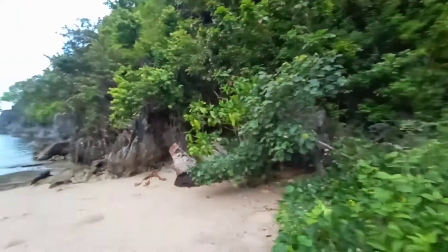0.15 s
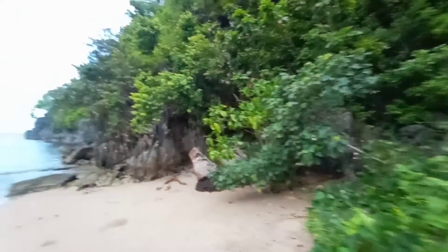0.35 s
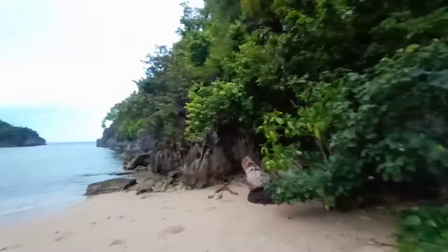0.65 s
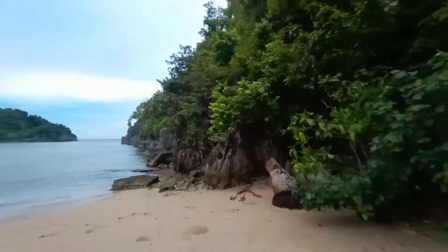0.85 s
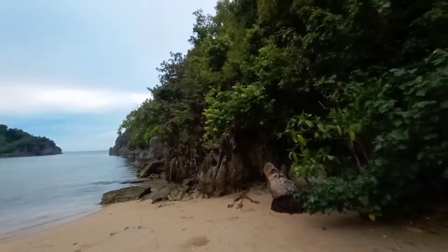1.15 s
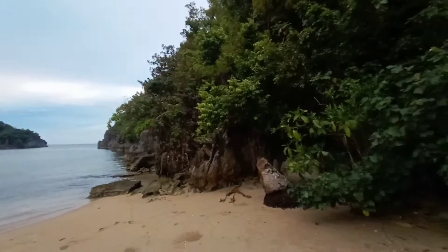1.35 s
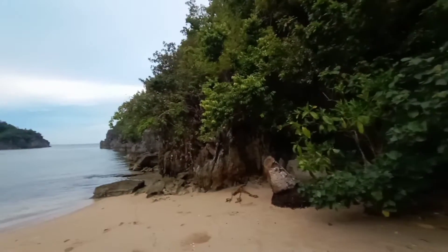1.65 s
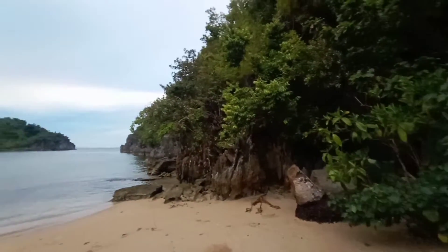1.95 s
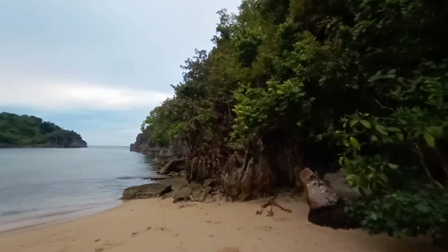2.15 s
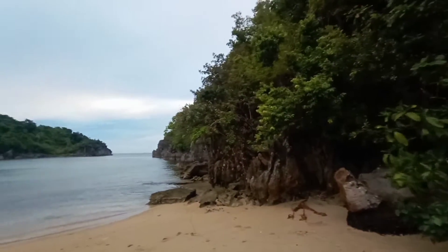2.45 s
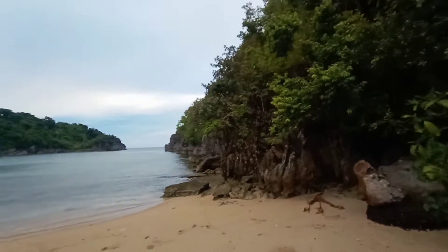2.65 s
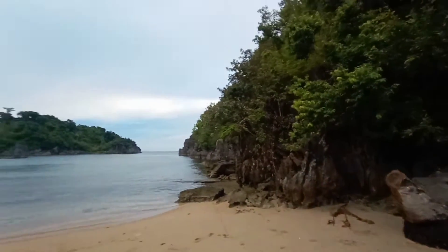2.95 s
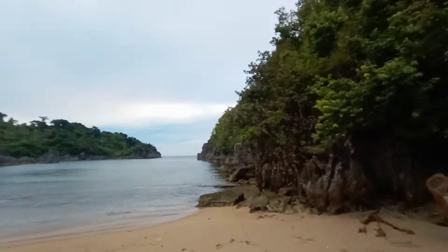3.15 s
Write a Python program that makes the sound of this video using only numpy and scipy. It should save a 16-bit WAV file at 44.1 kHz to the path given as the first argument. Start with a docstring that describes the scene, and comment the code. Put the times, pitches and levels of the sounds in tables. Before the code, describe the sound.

Small waves wash onto sand: foam rushes over a low slosh with popping bubbles, swells again with sharp splashes, then drains quietly. Close, nearly mono, hollow sound from a microphone inside a housing, outdoors on a beach.

```python
"""Small waves wash up a sandy beach and drain back, heard by a microphone that sits in a housing.
At first foam rushes over a low slosh amid many bubble pops; near 1.3 s the rush swells again with sharp splashes.
From about 2 s the water drains and fades, with a few splashes and longer watery blips towards the end at 3.3 s.
Noise and swarms of short sines form the water; the housing's resonances colour most of it and sing near 1250 Hz.
The two channels are almost alike: a common middle, a faint noise in opposite phase, and hiss."""
import sys
import numpy as np
from scipy import signal
from scipy.fft import rfft, irfft, next_fast_len
from scipy.io import wavfile
from scipy.ndimage import uniform_filter1d, map_coordinates

SR = 44100
rng = np.random.default_rng(int(sys.argv[2]) if len(sys.argv) > 2 else 0)


def waveform_to_disk(signal):
    """Save audio, clipped to [-1, 1], as 16-bit WAV at the path in sys.argv[1]."""
    frames = np.transpose(np.atleast_2d(signal))
    scaled = np.clip(frames, -1, 1) * 32767
    samples = np.round(scaled).astype(np.int16)
    wavfile.write(sys.argv[1], SR, samples)


N = 145530  # samples, 3.3 s


def amp(db):
    """Logarithmic level: 20 dB is a factor of ten in amplitude."""
    return 10 ** (np.asarray(db) / 20)


def unit(x):
    """Normalisation: the signal is scaled to rms 1."""
    return x / np.sqrt(np.mean(x ** 2) + 1e-20)


def along(points, hz):
    """Logarithmic frequency scale: (Hz, value) points are joined by lines over log frequency."""
    point_hz, value = np.transpose(points)
    return np.interp(np.log(hz + 1), np.log(point_hz + 1), value)


def curves(rows):
    """Linear interpolation in time: one value per sample for each column after the time."""
    s, *columns = np.transpose(rows)
    t = np.arange(N) / SR
    return [np.interp(t, s, column) for column in columns]


def wobble(rate):
    """Slow random modulation: a smooth curve through random knots, rate knots a second."""
    knots = rng.standard_normal(int(N * rate / SR) + 4)
    return map_coordinates(knots, [np.arange(N) * rate / SR])


def filtered(x, response):
    """Linear filtering: the spectrum of x is multiplied by a response of frequency."""
    size = next_fast_len(N + 8192)
    hz = np.fft.rfftfreq(size, 1 / SR)
    return irfft(rfft(x, size) * response(hz), size)[..., :N]


def housed(x, lo_hz, hi_hz):
    """Cavity resonance: one band of x takes on the colour of the housing, at rms 1."""
    # Response of the housing. Each row: frequency in Hz, relative level in dB.
    housing = [(24, -67), (40, -41), (111, -15.5), (192, -11.5), (260, -12), (387, -10.5), (496, -8),
               (606, -5), (859, -7.5), (998, -7.5), (1130, -6), (1250, 6.5), (1380, -3), (2010, -8),
               (2570, -3), (3470, -4), (3930, -9.5), (4460, -25.5), (5300, -22), (6160, -22.5),
               (7160, -21.5), (8110, -28), (9180, -25.5), (12700, -52), (15500, -43)]

    def response(hz):
        low_edge = 1 + (lo_hz / (hz + 1)) ** 16
        high_edge = 1 + (hz / hi_hz) ** 16
        return amp(along(housing, hz)) / np.sqrt(low_edge * high_edge)

    return unit(filtered(x, response))


def patchy(depth_db):
    """Modulated noise: white noise whose gain varies in random patches of time and frequency."""
    z = signal.stft(rng.standard_normal(N), nperseg=1024, noverlap=768)[2]
    field = uniform_filter1d(rng.standard_normal(z.shape), size=4, axis=0)  # over frequency
    field = uniform_filter1d(field, size=18, axis=1)  # over time
    noise = signal.istft(z * amp(depth_db * unit(field)), nperseg=1024, noverlap=768)[1]
    return unit(noise[:N])


def bubbles(s, gain, hz, cycles, rise, size=500):
    """Bubble resonance: short sines swell and fade; a positive rise lifts their pitch on the way."""
    u = np.arange(size) / SR * (hz / cycles)[:, None]  # time in units of the length
    swell = (np.e * 2 * u * np.exp(-2 * u)) ** 2  # peaks at 1 when u = 0.5
    wave = gain[:, None] * swell * np.sin(2 * np.pi * cycles * u * (1 + rise * u))
    at = (s * SR).astype(int)[:, None] + np.arange(size)
    return np.bincount(at.ravel(), wave.ravel(), N + size)[:N]


def foam(lo_hz, hi_hz, cycles, spread_db, share, depth_db, count, size=500):
    """Incoherent summation: bubbles of chance pitch and gain add in power to a patchy rush."""
    place = rng.random((count, 2))
    chance = np.clip(rng.standard_normal(count), -2.5, 2.5)
    s = place[:, 0] * N / SR
    pitch_hz = lo_hz * (hi_hz / lo_hz) ** place[:, 1]
    grains = bubbles(s, amp(spread_db * chance), pitch_hz, cycles, 0.029, size=size)
    # share is the bubbles' part of the power
    mix = np.sqrt(share) * unit(grains) + np.sqrt(1 - share) * patchy(depth_db)
    return housed(mix, lo_hz, hi_hz)


def focused(x, centre_hz, lift_db, width, size):
    """Moving resonance: a lifted band follows a centre while the power of each frame is kept."""
    overlap = size - size // 8
    hz, t, z = signal.stft(x, SR, nperseg=size, noverlap=overlap)
    centre = np.interp(t * SR, np.arange(N), centre_hz)
    distance = np.log((hz[:, None] + 1) / centre) / width
    lift = amp(lift_db * np.exp(-distance ** 2))
    power_ratio = np.sum(np.abs(z * lift) ** 2, 0) / np.sum(np.abs(z) ** 2 + 1e-20, 0)
    lift /= np.sqrt(power_ratio + 1e-9)
    return unit(signal.istft(z * lift, SR, nperseg=size, noverlap=overlap)[1][:N])


def drone():
    """Low-pass noise: a steady faint background falls away above 60 Hz."""
    noise = rng.standard_normal(N)
    return amp(-95) * unit(filtered(noise, lambda hz: 1 / (1 + (hz / 60) ** 4)))


def microphone_hiss():
    """Self-noise: treble hiss above 11 kHz, mostly common to both channels, with a weaker opposed part."""
    # Spectrum of the self-noise. Each row: frequency in Hz, relative level in dB.
    hiss_spectrum = [(5590, -32), (9500, 0), (11400, 6.5), (12600, 4), (14900, 4), (15500, 12.5)]
    noise = rng.standard_normal((2, N))
    hiss = filtered(noise, lambda hz: amp(along(hiss_spectrum, hz)) * (hz > 11000))
    centre, spread = unit(hiss[0]), amp(-12) * unit(hiss[1])
    return amp(-75) * np.array([centre + spread, centre - spread])


def sides():
    """Phase opposition: faint patchy noise, independent of the middle, to be added left and subtracted right."""
    # Spectrum of the noise that differs. Each row: frequency in Hz, relative level in dB.
    apart_spectrum = [(15, -50), (25, -11), (160, 6), (759, -1), (1260, -10), (3500, -23), (3870, 12.5),
                      (6610, -64), (8750, -25), (11000, -47), (14300, -61), (22000, -120)]
    return amp(-79.5) * unit(filtered(patchy(2.6), lambda hz: amp(along(apart_spectrum, hz))))


def slosh():
    """Low-frequency resonance: water gurgles around a moving centre, over lapping and rumble."""
    # Gurgling. Each row: time in seconds, level in dB before the wobble, centre in Hz.
    gurgle_rows = [(0.0, -60.5, 239), (0.07, -49, 230), (0.13, -47.5, 486), (0.27, -47.5, 336),
                   (0.31, -61, 454), (0.5, -55.5, 172), (0.61, -43, 211), (0.67, -46, 267),
                   (0.9, -57.5, 247), (1.01, -52, 313), (1.17, -49, 246), (1.53, -51.5, 372),
                   (1.59, -45.5, 267), (1.77, -58, 396), (1.89, -53.5, 278), (1.96, -61.5, 412),
                   (2.13, -62.5, 373), (2.43, -69.5, 260), (2.46, -71.5, 490), (2.59, -67, 260),
                   (2.65, -62.5, 424), (3.11, -69.5, 192), (3.14, -65, 313), (3.3, -64.5, 292)]
    # Low bed. Each row: time in seconds, level of the lapping in dB, rumble in dB before its wobble.
    bed_rows = [(0.0, -67, -86), (0.07, -57, -63), (0.15, -51, -93), (0.27, -64, -64), (0.31, -57.5, -77),
                (0.42, -69, -59.5), (0.6, -52, -61), (0.65, -61, -83), (0.71, -55, -55.5), (0.81, -62, -77),
                (0.86, -62, -65), (0.95, -62, -77), (1.07, -61.5, -59.5), (1.29, -55, -62.5),
                (1.42, -59, -58), (1.49, -51.5, -74), (1.68, -55, -58), (1.71, -53.5, -67.5),
                (2.36, -74.5, -77.5), (3.3, -70.5, -71.5)]
    level_db, centre_hz = curves(gurgle_rows)
    lap_db, rumble_db = curves(bed_rows)
    gurgle = foam(125, 620, cycles=6, spread_db=3, share=.08, depth_db=2.5, count=900, size=4000)
    gurgle = focused(gurgle, centre_hz, 13, 0.78, size=2048)
    gurgle = amp(level_db + 1.9 * wobble(10.96)) * gurgle
    lap = foam(600, 1030, cycles=8, spread_db=3.8, share=.12, depth_db=4, count=700, size=1500)
    rumble = amp(rumble_db + 1.05 * wobble(5.67)) * housed(rng.standard_normal(N), 30, 138)
    return gurgle + amp(lap_db) * lap + rumble


def pops():
    """Bubble resonance: single bubbles ring at a steady pitch, short pops and longer blips of water."""
    # Bursting bubbles. Each row: time of the peak in seconds, peak in dB, pitch in Hz.
    pop_rows = [(0.007, -36, 7000), (0.021, -38, 9200), (0.039, -35, 4900), (0.051, -28, 5140),
                (0.081, -30, 6400), (0.141, -35, 6240), (0.153, -35, 4600), (0.167, -28.5, 6940),
                (0.230, -49, 9600), (0.257, -42, 8900), (0.266, -34, 9200), (0.316, -39, 9600),
                (0.688, -42, 6950), (0.689, -42.5, 10700), (0.838, -48, 9000), (0.938, -47, 9200),
                (1.038, -38.5, 6760), (1.055, -45, 7200), (1.174, -45, 9300), (1.241, -40, 8900),
                (1.271, -41, 9500), (1.272, -36, 5000), (1.418, -42, 8460), (1.686, -45, 9100),
                (1.890, -48, 9700), (3.105, -45, 9300)]
    # Blips of water. Each row: time of the peak in seconds, peak in dB, pitch in Hz, length in cycles.
    blip_rows = [(2.655, -55.5, 440, 11), (3.08, -60.5, 108, 7), (3.143, -48, 1120, 7),
                 (3.157, -51, 973, 16), (3.172, -56, 5050, 45), (3.245, -50, 5980, 38),
                 (3.25, -61, 5000, 60), (3.275, -56, 4970, 50), (3.285, -51.5, 287, 9)]
    rows = [(*row, 7.5) for row in pop_rows] + list(blip_rows)  # every pop is 7.5 cycles long
    total = np.zeros(N)
    for s, db, hz, cycles in rows:
        start = np.array([s - cycles / hz / 2])
        total += bubbles(start, amp([db]), np.array([hz]), cycles, 0, size=8000)
    return total


def splashes():
    """Impulsive noise: brief broad bursts start suddenly and decay exponentially."""
    # Splashes. Each row: start in seconds, level in dB before the decay, decay time in seconds.
    splash_rows = [(0.015, -35, 0.0035), (0.034, -46, 0.0054), (0.162, -44, 0.014), (0.23, -44, 0.0066),
                   (0.31, -40, .01), (0.568, -38, 0.011), (1.242, -28, 0.0069), (1.244, -32, 0.0027),
                   (1.278, -23, 0.001), (1.375, -30.5, 0.024), (1.639, -36, 0.0095), (2.323, -38, 0.012),
                   (2.39, -42, 0.012), (3.241, -50, 0.008), (3.286, -38, 0.0037)]
    t = np.arange(N) / SR
    shape = np.zeros(N)
    for s, db, length in splash_rows:
        u = np.clip((t - s) / length, 0, 50)
        shape += amp(db) * np.minimum(2 * u, 1) * np.exp(-u)
    return shape * housed(rng.standard_normal(N), 960, 13000)


def fizz(surge_db):
    """Superposed bubble bursts: fine foam fizzes on the sand, with soft puffs of spray on top."""
    # Fizz. Each row: time in seconds, level in dB before the surge, bright band over it in dB,
    # finest foam over it in dB before its wobble.
    fizz_rows = [(0.0, -49, -6, -18), (0.03, -51, -6, -8), (0.04, -49, -4, -17), (0.05, -45, -4, -15),
                 (0.06, -48, -5, -10), (0.3, -46.5, -3.5, -7), (0.56, -58.5, -3.5, -5),
                 (0.6, -59.5, 4, 0.5), (0.82, -54, 0, -11), (0.9, -59.5, 2, -3.5), (1.22, -53, -3, -6),
                 (1.27, -50, -4.5, -12), (1.32, -51, -3, -8.5), (1.56, -50, -5.5, -10.5),
                 (2.09, -63, -1.5, -7), (2.32, -66, 4, -7), (2.43, -63.5, -2.5, -8), (2.47, -72, 6, -2),
                 (2.76, -67, -2, -11.5), (3.22, -67.5, 3, -2.5), (3.24, -62, -0.5, -6), (3.3, -69, 8, -9)]
    # Treble resonances that drift as the microphone turns.
    # Each row: time in seconds, lower centre in Hz, upper centre in Hz.
    drift_rows = [(0, 5800, 6500), (0.55, 6000, 6800), (0.88, 5400, 6900), (1.0, 5850, 6840),
                  (1.3, 5350, 6900), (1.6, 5570, 6950), (2.0, 5550, 7500), (2.45, 5470, 7700),
                  (2.9, 5340, 7540), (3.1, 5700, 7600), (3.3, 5300, 7300)]
    # Puffs of spray. Each row: time of the peak in seconds, peak level in dB, time to fall to 1/e in seconds.
    puff_rows = [(0.282, -61, .05), (0.69, -62, .006), (0.795, -61, 0.014), (1.157, -68, .015),
                 (1.26, -61, 0.022), (2.41, -71, 0.023)]
    level_db, bright_db, fine_db = curves(fizz_rows)
    lower_hz, upper_hz = curves(drift_rows)
    coarse = foam(4400, 6150, cycles=9, spread_db=4, share=.1, depth_db=3, count=3000)
    coarse = focused(coarse, lower_hz, 7, .06, size=512)
    bright = foam(6350, 7800, cycles=10, spread_db=4, share=.1, depth_db=3, count=3000)
    bright = focused(bright, upper_hz, 4, .07, size=512)
    fine = foam(7960, 18500, cycles=8, spread_db=3.5, share=0.14, depth_db=4.5, count=4000)
    bands = coarse + amp(bright_db) * bright + amp(fine_db + 1.2 * wobble(16)) * fine
    t = np.arange(N) / SR
    puffs = sum(amp(db) * np.exp(-((t - s) / length) ** 2) for s, db, length in puff_rows)
    spray = foam(10400, 13500, cycles=5, spread_db=5, share=.4, depth_db=2, count=3000)
    return amp(level_db + 2.0 * surge_db) * bands + puffs * spray


def wash(surge_db):
    """Turbulent flow noise: the water rushes, and the housing's resonance lifts a hollow band out of it."""
    # Rush. Each row: time in seconds, level in dB before the surge, lower part over it in dB.
    wash_rows = [(0.0, -44, -3), (0.04, -41, -4), (0.31, -39.5, -8.5), (0.35, -34.5, -2.5),
                 (0.38, -41.5, -4), (0.51, -44, -9), (1.23, -41, -8), (1.24, -38, -4.5), (1.3, -41, -6.5),
                 (1.37, -40.5, -3.5), (1.39, -42, -12), (1.44, -42, 0), (1.46, -40, -6),
                 (1.97, -45.5, -5.5), (2.27, -50, -11), (2.3, -48.5, -0.5), (2.37, -48.5, -16),
                 (2.64, -55.5, -9), (2.94, -56.5, -4), (3.02, -52, -4.5), (3.08, -56.5, -11),
                 (3.3, -50, -32)]
    # Hollow band. Each row: time in seconds, level in dB before the surge.
    hollow_rows = [(0.0, -48), (0.22, -55.5), (0.24, -46.5), (1.23, -41), (1.49, -47.5), (1.66, -40),
                   (1.68, -50), (1.82, -46), (1.89, -52), (1.91, -48), (2.15, -51.5), (2.3, -53),
                   (2.7, -61.5), (2.77, -58), (3.07, -62), (3.15, -51), (3.28, -50.5), (3.3, -43)]
    level_db, lower_db = curves(wash_rows)
    hollow_db = curves(hollow_rows)[0]
    rush = foam(2150, 4400, cycles=9, spread_db=3.5, share=.12, depth_db=3.6, count=4000)
    lower = foam(1430, 2150, cycles=9, spread_db=3.3, share=.1, depth_db=3.8, count=2000)
    hollow = housed(patchy(1), 1020, 1500)
    water = amp(level_db) * (rush + amp(lower_db) * lower)
    return amp(surge_db) * (water + amp(hollow_db) * hollow)


def scene():
    """Superposition: water in the middle, a faint independent noise in opposite phase in the channels, hiss."""
    surge_db = 0.38 * wobble(8.905) + 0.5 * wobble(34.55)  # shared by wash and fizz
    mid = drone() + slosh() + pops() + splashes() + fizz(surge_db) + wash(surge_db)
    side = sides()
    return np.array([mid + side, mid - side]) + microphone_hiss()


def record(dry):
    """Band limitation: nothing at or above 15520 Hz is kept."""
    return filtered(dry, lambda hz: hz < 15520)


dry = scene()
out = record(dry)
waveform_to_disk(out)
```